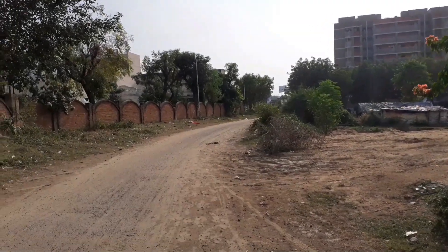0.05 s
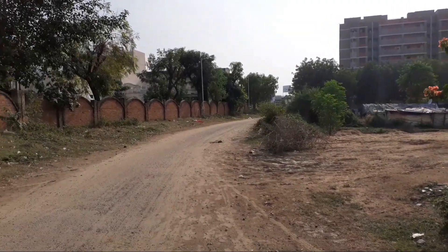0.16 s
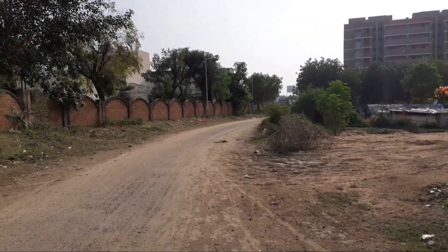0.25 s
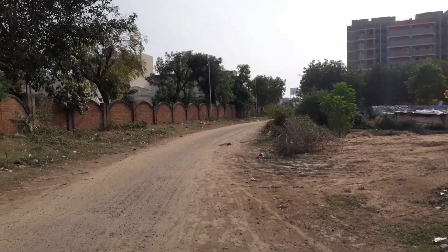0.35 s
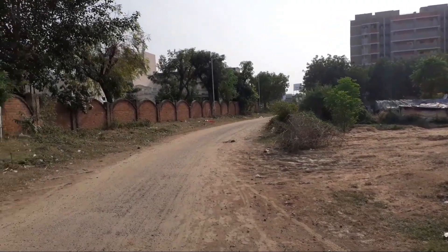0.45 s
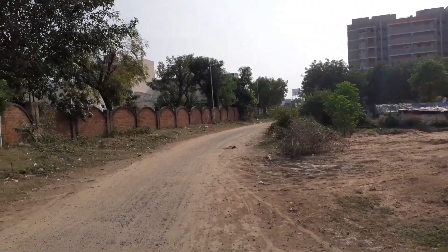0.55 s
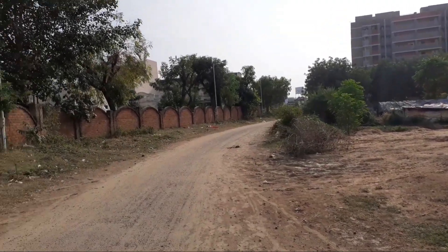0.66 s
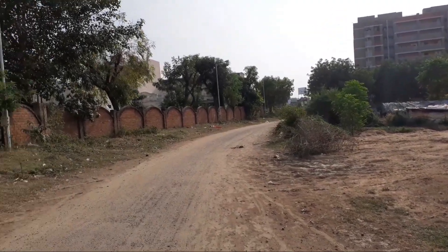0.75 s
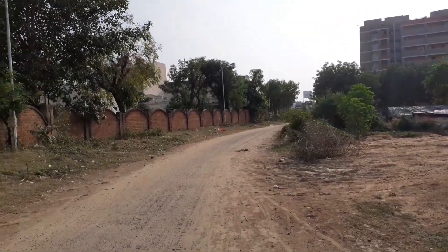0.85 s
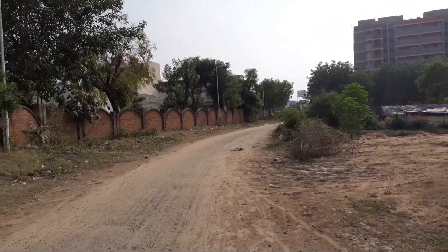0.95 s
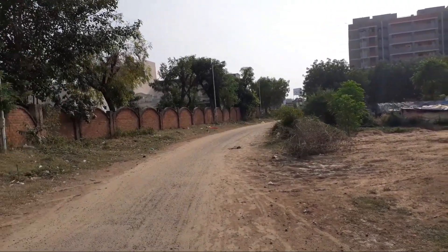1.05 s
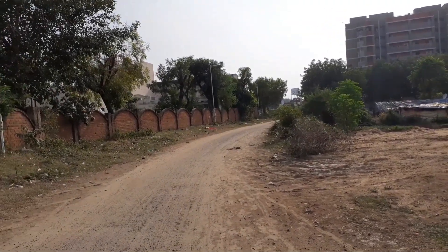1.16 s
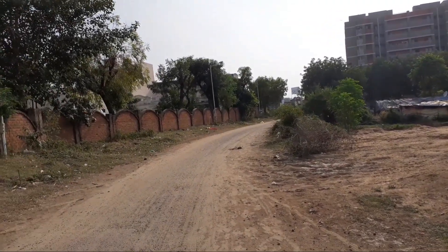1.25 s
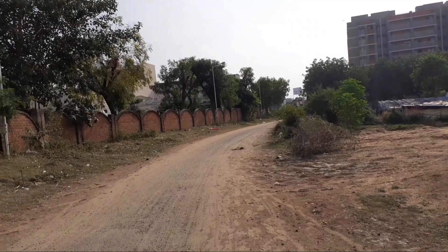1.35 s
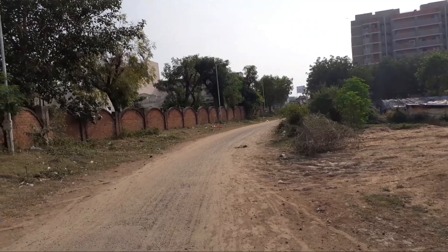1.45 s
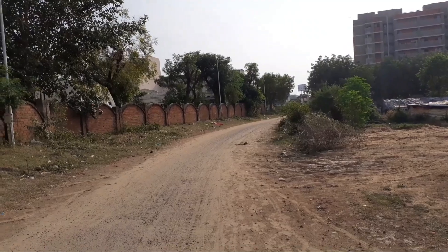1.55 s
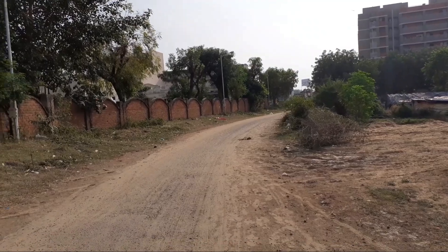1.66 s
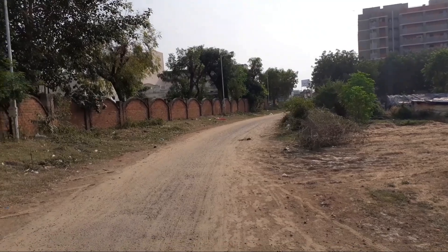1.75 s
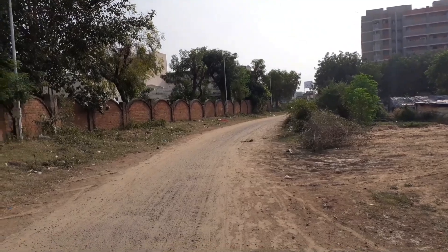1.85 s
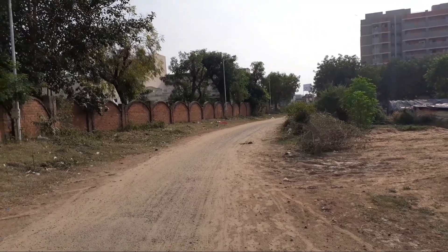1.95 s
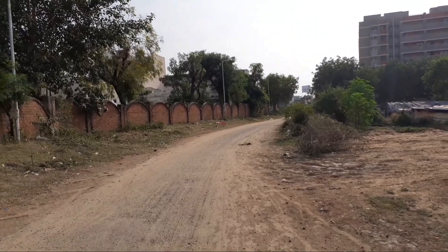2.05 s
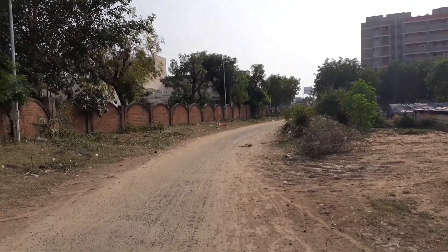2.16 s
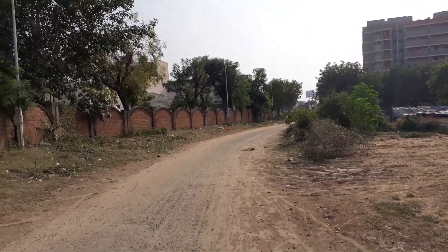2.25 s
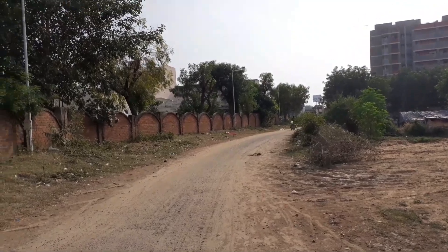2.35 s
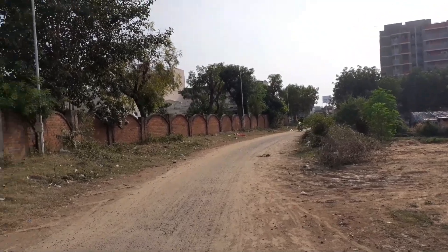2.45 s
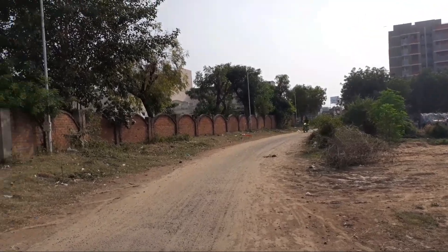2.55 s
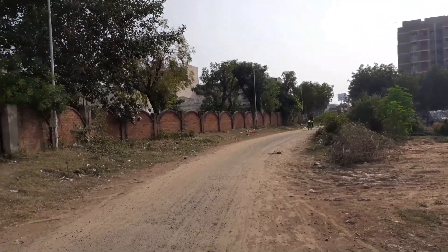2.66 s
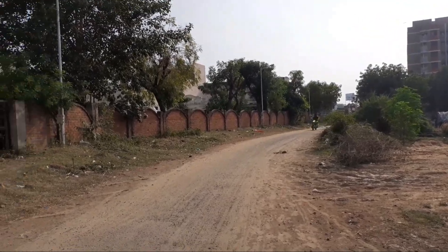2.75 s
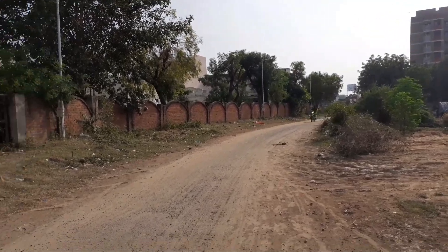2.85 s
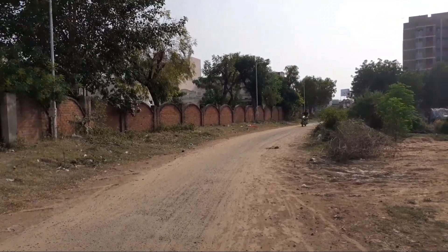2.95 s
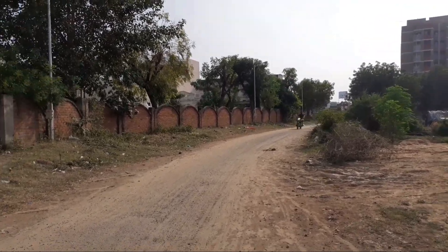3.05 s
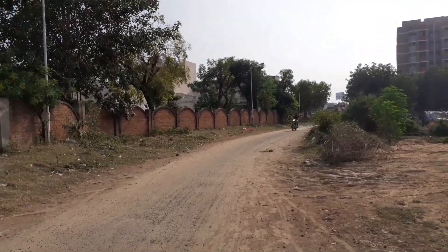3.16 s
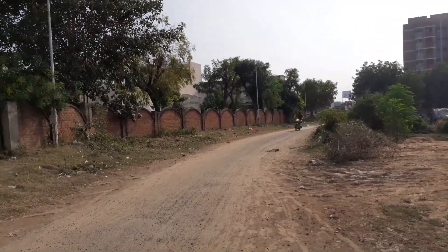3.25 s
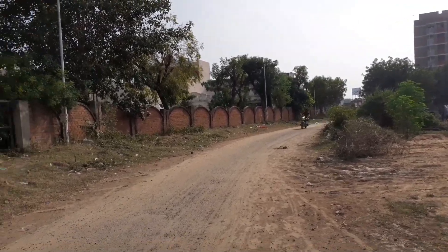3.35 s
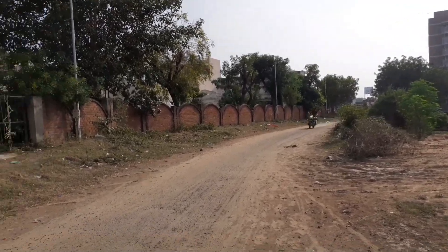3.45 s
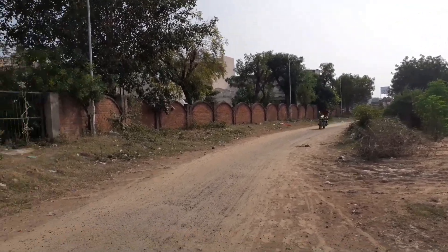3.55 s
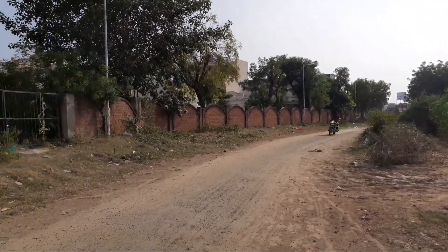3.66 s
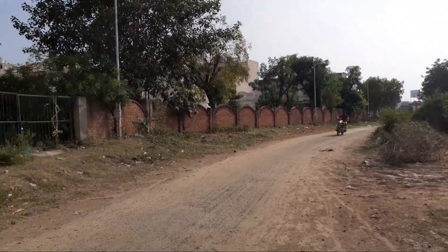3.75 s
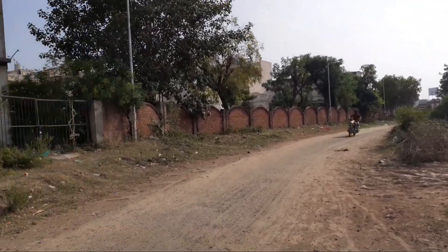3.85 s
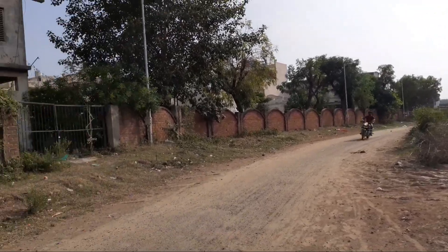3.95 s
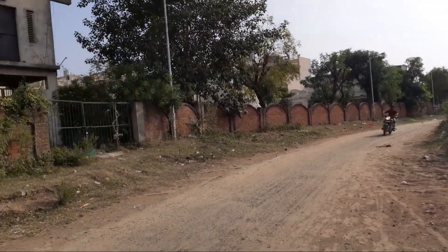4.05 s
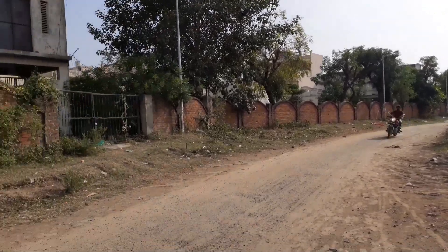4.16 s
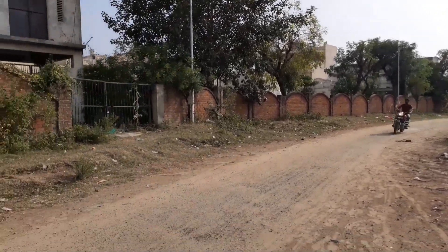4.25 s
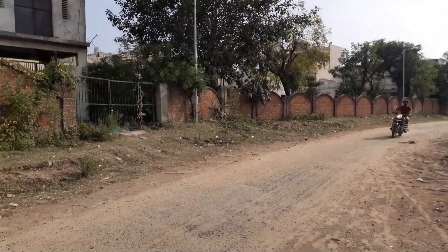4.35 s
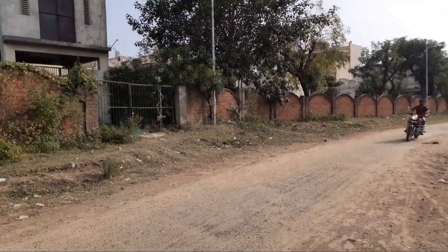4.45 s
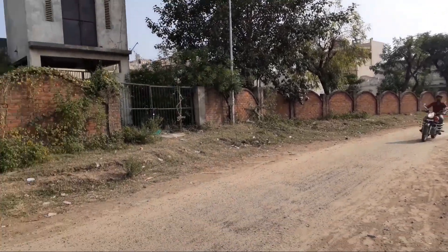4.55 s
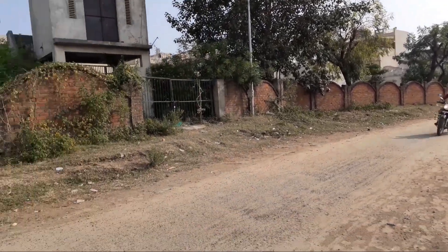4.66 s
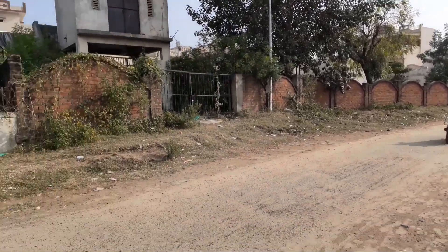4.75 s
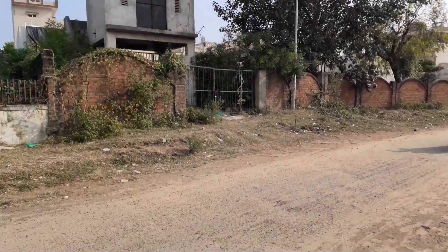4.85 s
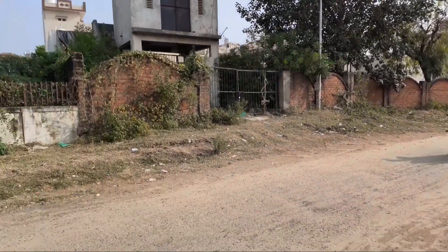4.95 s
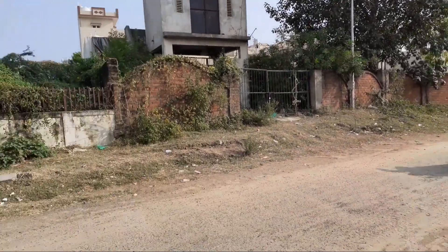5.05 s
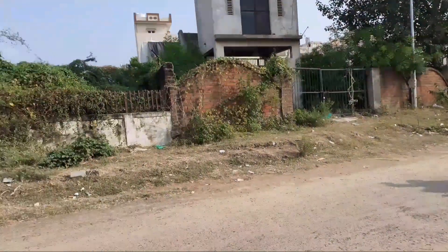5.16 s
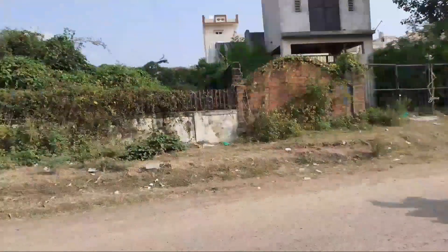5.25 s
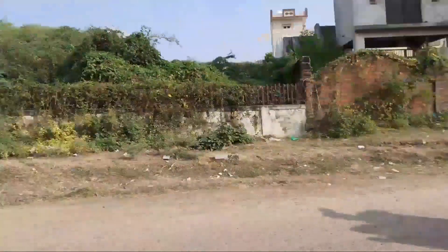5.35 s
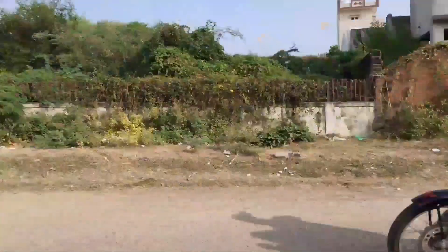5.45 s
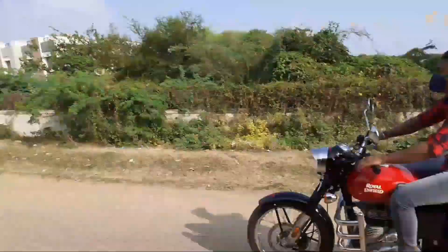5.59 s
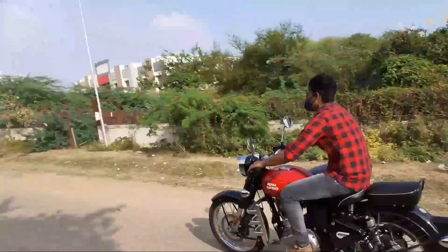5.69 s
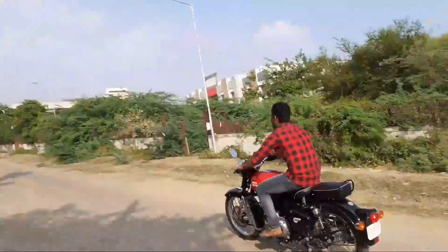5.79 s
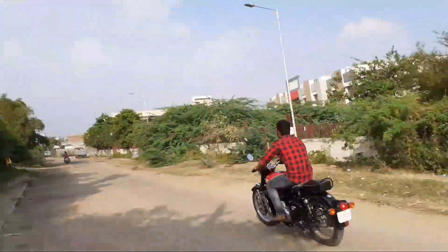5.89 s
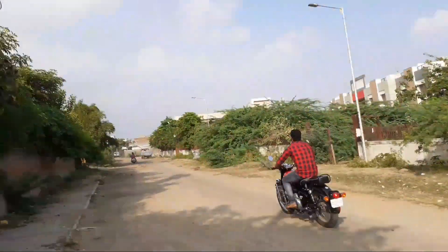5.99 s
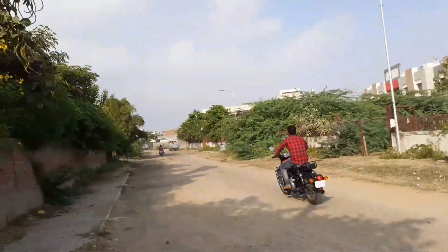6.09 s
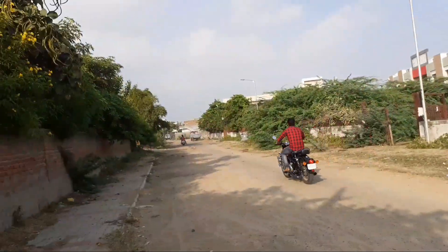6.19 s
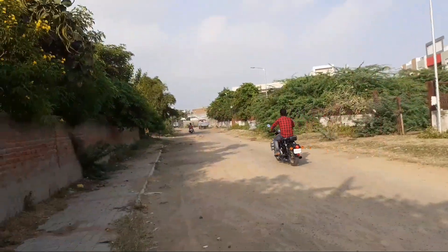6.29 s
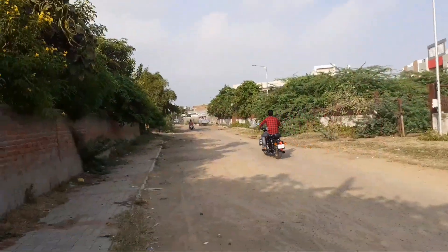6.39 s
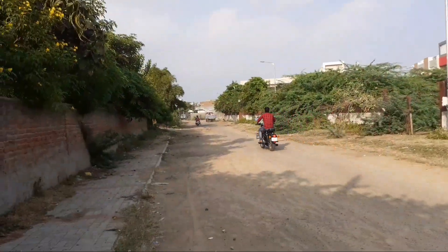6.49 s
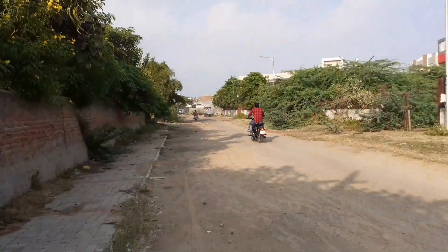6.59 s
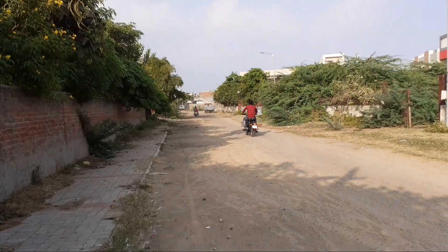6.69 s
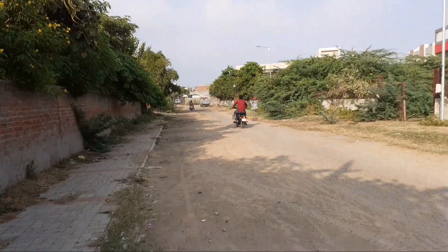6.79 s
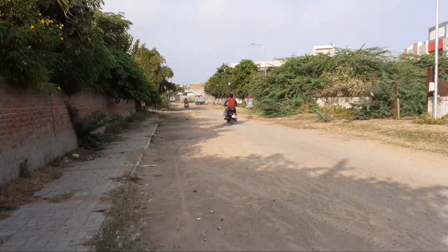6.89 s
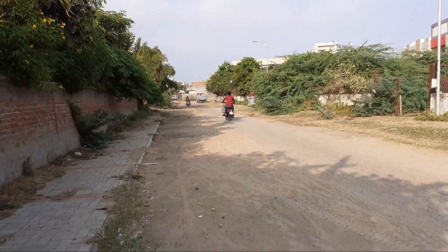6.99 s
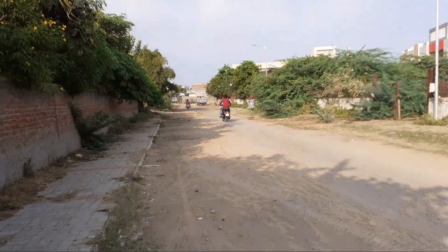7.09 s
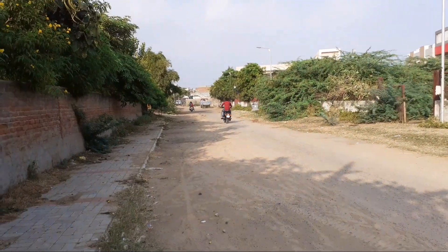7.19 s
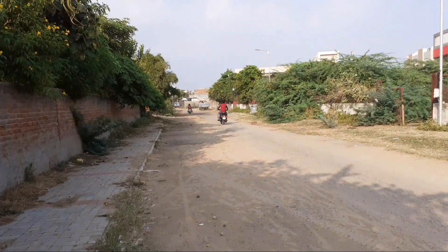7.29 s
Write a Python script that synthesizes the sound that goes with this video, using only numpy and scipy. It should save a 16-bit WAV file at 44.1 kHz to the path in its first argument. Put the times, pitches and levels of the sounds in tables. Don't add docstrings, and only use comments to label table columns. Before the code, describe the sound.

Roadside stereo phone microphone, open dirt road with walls, trees and a house. From 0 s a distant single-cylinder motorcycle thumps at about 27 beats per second over quiet field air, with tiny bird chirps near the start, 1.5 and 2.5 s. The throttle closes at 0.65-0.95 s for a gear change, then the beat pulls from about 25 up to 32. Second change at 2.65-2.95 s, third at 3.85-4.1 s, with muffled low pops and faint gear whine; each pull is louder and sharper, with quick wall echoes and light metallic ticks. From 4.9 to 5.9 s it is close: hard cracking exhaust, hiss, buzzing and clinking loose metal, house and gate echoes. At 5.94 s it passes and the crack drops abruptly to round low puffs, slowing to about 17 per second, with faint chain whirr around 6.3-6.7 s. It fades nearly to quiet air by 7.3 s.

```python
import sys
import numpy as np
from scipy import signal
from scipy.fft import rfft, irfft, next_fast_len
from scipy.io import wavfile
from scipy.ndimage import uniform_filter1d, map_coordinates

SR = 44100
rng = np.random.default_rng(int(sys.argv[2]) if len(sys.argv) > 2 else 0)


def wav_record(signal):
    frames = np.transpose(np.atleast_2d(signal))
    bounded = np.clip(frames, -1, 1)
    quanta = np.round(bounded * 32767).astype(np.int16)
    wavfile.write(sys.argv[1], SR, quanta)


def ratio_of_db(decibels):
    return 10 ** (np.asarray(decibels, float) / 20)


N = 323208
T = np.arange(N) / SR
PASSED_S = 5.94
COASTING = 0.16

# pitch_hz, level_db
FIELD = [(40, -38), (90, -8), (300, -3.5), (620, -4), (1200, -21.5), (3800, -20.5), (8300, -33),
         (15500, -36)]
# start_s, length_s, start_hz, end_hz, level_db
BIRDS = [(.13, .03, 4700, 5600, -54), (.64, .025, 5200, 4600, -61), (.72, .025, 4700, 5000, -61),
         (1.57, .03, 4700, 5300, -55), (6.9, .19, 4000, 6100, -74), (.08, .06, 2700, 2250, -48),
         (0, .05, 2950, 2850, -52), (1.44, .045, 3300, 3150, -49), (2.45, .06, 3650, 3600, -49),
         (2.47, .04, 5150, 5200, -55), (2.51, .04, 5900, 5850, -56)]
# middle_s, length_s, level_db
SCUFFS = [(1.035, .055, -42), (2.89, .008, -45), (3.14, .025, -46), (.38, .03, -60), (6.5, .006, -60),
          (5.082, .012, -40), (5.236, .008, -40), (5.929, .006, -36), (5.947, .006, -40)]
# pitch_hz, time_to_fade_60_db_s
TREES = [(100, 1), (500, 0.12), (3000, 0.31)]
# pitch_hz, likeness_0_to_1
ALIKE = [(60, 1), (500, 0.74), (1500, 0.074), (3000, 0.049), (7000, 0.029), (15000, 0.033)]
# start_s, length_s, start_hz, end_hz, level_db
GLIDES = [
    (6.331, 0.216, 323, 380, -49),
    (6.466, 0.282, 270, 330, -50),
]
# start_s, peak_db, pitch_hz
RATTLES = [(0.515, -22.5, 2300), (1.5509, -28, 2100), (3.1807, -36, 3410), (4.028, -26.5, 1970),
           (4.86, -15, 2880), (5.082, -22, 3380), (5.224, -15, 2620), (5.333, -3, 2160),
           (5.449, -10.5, 2340), (5.609, -9, 2920), (5.6706, -7, 2280), (5.7358, -23, 2440),
           (5.9144, -2.5, 2840)]
# start_s, end_s, peak_db, pitch_hz
SHIELD = [
    (1.22, 1.53, -36, 2020),
    (3.08, 3.4, -34, 3500),
    (3.68, 3.88, -32, 3500),
    (4.33, 4.8, -25.5, 3410),
    (5.37, 5.887, -12, 2280),
]
# start_s, peak_db, pitch_hz
MORE_RATTLES = [(0.3282, -40, 1800), (1.1578, -46, 2610), (1.3129, -35, 1850), (1.5883, -32, 1960),
                (1.6207, -32, 2010), (1.7025, -27, 2420), (1.7399, -31, 2410), (1.777, -24, 2040),
                (1.8138, -25, 2050), (1.8592, -28.5, 2310), (1.8856, -28, 2010), (1.921, -27, 2050),
                (1.9565, -30, 3150), (2.0951, -28, 2020), (2.2313, -34, 1970), (2.2638, -32, 2130),
                (2.3291, -34, 2480), (2.361, -28, 2850), (3.0659, -48, 2640), (3.0944, -34, 2320),
                (3.1223, -30, 1910), (3.21, -29, 1830), (3.4206, -24.5, 3500), (3.4481, -35, 2130),
                (3.5364, -30, 1890), (3.5658, -23, 3520), (3.5932, -25, 3450), (3.6507, -22.5, 3440),
                (3.7349, -34, 3130), (4.2946, -38, 1980), (4.4702, -33, 2150), (4.5905, -32, 2130),
                (4.8953, -19, 2860)]
# start_s, peak_db, pitch_hz
CLINKS = [(5.0035, -30, 4430), (5.0474, -36, 3570), (5.1365, -25, 4100), (5.1911, -41, 3644),
          (5.2574, -23, 3740), (5.2994, -29, 4500), (5.3326, -19, 6850), (5.3647, -27, 3850),
          (5.3842, -26, 3990), (5.5083, -26, 3520), (5.575, -27, 4280), (5.6376, -23, 3600),
          (5.7019, -37, 3700), (5.7984, -28, 4000), (5.8491, -27, 4150), (5.882, -22, 5170)]
# middle_s, length_s, pitch_hz, level_db
WHINE = [
    (2.95, 0.15, 1016, -52),
    (4.13, 0.17, 1010, -47),
]
# pitch_hz, level_db
GEAR = [(200, -5.5), (400, 5), (700, -3), (1000, -9), (1300, -10.5), (1770, -15.5), (2050, -13),
        (2700, -14.5), (3530, -14.5), (4200, -19.5), (6000, -28.5), (9000, -62)]
# pitch_hz, level_db
AIR = [(3500, -7), (5000, -10), (7000, -6.5), (8000, -9), (8400, -15), (8900, -9), (12500, -11),
       (14800, -17), (15600, -26)]
# machinery_db, bright_hiss_db
BRIGHT = [(-76, -93), (-52, -64), (-40.5, -52.5), (-40, -60), (-38.5, -50.5), (-29.5, -41.5)]
# time_s, gain_over_steady_hiss
FLARE = [(0, 0.83), (1, 0.73), (1.5, 0.72), (2.3, 1.4), (2.7, 0.34), (3.1, 1.2), (3.8, 0.7), (4.2, 0.65),
         (5, 0.91), (5.3, 2), (5.6, 3.3), (5.9, 2.8), (6, 0.4), (7.33, 1.1)]
BRIGHT_ECHO_DB = (-2, 0.5, 4)
# closes_s, shut_s, starts_to_open_s, open_s, depth_0_to_1
SHIFTS = [
    (.63, .72, .945, .96, 1),
    (2.62, 2.75, 2.915, 2.94, 1),
    (2.8, 2.9, 2.98, 3.06, .52),
    (3.84, 3.9, 4.07, 4.09, .95),
    (4, 4.05, 4.225, 4.3, .57),
    (5.97, 6, 6.02, 6.04, .6),
    (.9, .94, .98, 1.05, .4),
]
# pitch_hz, level_db
BURBLE = [(50, -27), (100, 0.5), (170, -9.5), (260, -32), (400, -61)]
BURBLE_DB = [-42, -48, -60, -31, -46, -40]
# time_s, lag_ms, level_db
YARD = [(6.04, 13, -6), (6.3, 10, -4), (7.33, 8, -3)]
# time_s, firings_per_s
FIRING = [(0, 26.7), (.719, 33.78), (1.098, 25.31), (1.351, 24.63), (2.634, 32.52), (2.861, 28.96),
          (3.146, 35.38), (3.283, 32.99), (3.956, 37.29), (4.089, 35.31), (4.339, 28.2), (4.784, 29.58),
          (5.293, 31.07), (5.541, 31.67), (5.848, 30.79), (5.994, 27.1), (6.74, 18.6), (7.33, 17)]
# time_s, late_ms
HUNTING = [(2.85, 0), (2.97, 1.3), (3.05, 1.1), (3.125, -1.2), (3.26, .7), (3.4, 0), (3.51, -.3),
           (3.77, .5), (3.87, 0), (4.1, .5), (4.19, -1.2), (4.31, 1.1), (4.4, -.1), (4.67, .5), (4.86, -.4),
           (4.97, .5), (5.07, 0), (5.23, .6), (5.42, -.4), (5.52, .5), (5.87, .2), (5.9, -.7), (5.93, -3),
           (5.97, 3), (6.04, 2.2), (6.25, .3), (6.5, -1.5), (6.8, 0)]
# time_s, exhaust_crack_db, machinery_db
RIDE = [(0, -30, -40), (.6, -30.5, -39), (1.1, -31.5, -40), (1.6, -28.5, -40), (2.6, -23.5, -38.5),
        (3.1, -21.5, -39), (3.8, -18.5, -35), (4.3, -17, -37.5), (4.6, -15.5, -34.5), (5.15, -16, -31.5),
        (5.3, -16, -29), (5.9, -17, -29.5), (5.94, -35, -35.5), (6.2, -40, -45.5), (6.4, -46.5, -47),
        (6.8, -59, -54), (7.1, -69.5, -61), (7.33, -70, -85)]
# crack_db, thump_db, boom_db
PRESSURE = [(-78, -70, -51), (-47.5, -37.5, -36.5), (-36, -22, -32.5), (-20.5, -28, -36.5),
            (-13, -13.5, -32)]
# time_s, late_ms, extra_db, idle_stroke_db
OVERRUN = [(.66, 0, 0, -5), (.7, 7, -1, -5), (.775, 7, -1, -5), (.79, 18, -1, -3), (.94, 18, -1, -3),
           (.955, 0, 0, -5), (2.7, 0, 0, -14), (2.735, 8, 4, -16), (2.92, 8, 4, -16), (2.93, 0, 0, -14),
           (3.87, 0, 0, -5), (3.93, 17, 6, -4), (4.07, 17, 6, -4), (4.085, 0, -3, -5), (4.22, 0, -3, -5),
           (4.27, 0, 0, -5)]
# time_s, lag_ms, level_db
WALL = [(0, 4.3, -4), (1.1, 5.3, -2), (2, 6.1, -2), (2.75, 7.1, -1), (3.25, 8.8, 0), (3.5, 10, 0),
        (3.75, 11.7, -1), (3.9, 13, -2), (4.09, 15, -1), (4.27, 16.6, -3), (4.4, 17.5, -12),
        (4.8, 17.5, -12), (4.9, 17.5, -22)]
# time_s, lag_ms, level_db
HOUSE = [(4.95, 19.6, -14), (5.03, 20.6, -4), (5.15, 22.2, -1), (5.35, 25.8, -5), (5.55, 29.4, -8),
         (5.7, 31.5, -18)]
# time_s, lag_ms, level_db
GATE = [(5.1, 6.3, -14), (5.3, 11.7, -7), (5.5, 14.9, -4), (5.7, 18.1, -5), (5.9, 18.1, -10)]
# time_s, lag_ms, level_db
WALL_TWICE = [(0.0, 8.6, -11), (0.5, 8.8, -9), (1.0, 10.3, -8), (1.5, 12.6, -9), (2.0, 12.5, -7),
              (2.5, 12.5, -7), (3.0, 12.6, -4), (3.15, 12.4, -6), (3.4, 15, -12)]
# time_s, lag_ms, level_db
HOUSE_BOUNCE = [(4.95, 22, -16), (5.05, 22.9, -5), (5.15, 24.4, -6), (5.25, 26, -11), (5.35, 27.6, -20)]
# pitch_hz, width_hz, level_db
PIPE = [(150, 110, 0)]
# pitch_hz, width_hz, level_db
SILENCER = [(60.5, 14.6, 6.5), (97.4, 46, 3.5), (121.4, 17, -3.5)]
# pitch_hz, width_hz, level_db
RASP = [(848, 246, 5), (980, 340, 10.5), (1409, 305, 8), (2100, 2330, -2.5)]
# pitch_hz, width_hz, level_db
BARK = [(912, 190, 0)]
# pitch_hz, width_hz, level_db
SNARL = [(690, 210, 0)]
# time_s, then share near order 4, 5.5 and 7
IDLE_TURN = [(0, 0, 0.14, 1), (1.4, 0.5, 0.0097, 0.63), (2.6, 0, 0.64, 0.019), (3.15, 0.052, 0, 0.38),
             (3.35, 0.35, 0, 0), (4, 0, 0.58, 0.48), (4.4, 0.5, 0, 0.5), (5.3, 0, 0.16, 0.31),
             (5.8, 0.49, 0.14, 0), (5.95, 0, 0, 0.057)]
# time_s, ms_by_which_left_lags
BEARING = [(0, 0.019), (3.2, 0.07), (3.7, 0.036), (4.2, 0.18), (4.7, 0.19), (5.2, 0.27), (5.8, 0.23),
           (6.2, 0.08), (6.6, -0.23), (7.33, -0.23)]


def unit(x):
    return x / np.sqrt(np.mean(x ** 2) + 1e-20)


def along(points, hz):
    f, v = np.transpose(points)
    return np.interp(np.log(hz + 1), np.log(f + 1), v)


def curves(rows, t=T):
    s, *cols = np.transpose(rows)
    return [np.interp(t, s, c) for c in cols]


def wobble(rate):
    return map_coordinates(rng.standard_normal(int(N * rate / SR) + 4), [T * rate])


def filtered(x, response):
    m = next_fast_len(N + SR // 2)
    return irfft(rfft(x, m) * response(np.fft.rfftfreq(m, 1 / SR)), m)[..., :N]


def through(blows, response):
    energy = np.mean(abs(response(np.linspace(1, SR / 2, 4096))) ** 2)
    return filtered(blows, response) / np.sqrt(energy * 30 / SR)


def resonances(modes, f):
    total = 0
    for k, (centre, width, db) in enumerate(modes):
        ring = 1j * f * width / (centre * centre - f * f + 1j * f * width)
        total = total + (-1) ** k * ratio_of_db(db) * ring
    return total


def shock(f, centre_hz, lean):
    u = f / centre_hz
    return -u ** 1.4 * np.exp(-u ** 2 / 2 - 1j * lean)


def spikes(times, sizes):
    at = np.clip(np.round(times * SR).astype(int), 0, N - 1)
    return np.bincount(at, sizes, N)


def pair(spectrum):
    def response(hz):
        turn = np.arccos(np.clip(along(ALIKE, hz), 0, 1)) / 2
        return ratio_of_db(along(spectrum, hz)) * [np.cos(turn), np.sin(turn)]
    mid, side = filtered(rng.standard_normal((2, N)), response)
    return unit(np.array([mid + side, mid - side]))


def patchy(x, depth_db):
    z = signal.stft(x, nperseg=256)[2]
    field = uniform_filter1d(rng.standard_normal(z.shape[1:]), size=3, axis=0)
    field = uniform_filter1d(field, size=12, axis=1)
    return unit(signal.istft(z * ratio_of_db(depth_db * unit(field)), nperseg=256)[1][:, :N])


def cycles():
    rate = curves(FIRING)[0]
    return np.cumsum(rate) / SR - .31 - rate * curves(HUNTING)[0] / 1000


def firings():
    count = cycles()
    return np.interp(np.arange(int(count[-1])), count, T)


def throttle(t):
    dips = [np.interp(t, times, [0, depth, depth, 0]) for *times, depth in SHIFTS]
    return np.clip(np.maximum(np.max(dips, axis=0), COASTING * (t > PASSED_S)), 0, 1)


def field_air():
    return ratio_of_db(-58.5) * ratio_of_db(2 * wobble(6)) * pair(FIELD)


def chirps(rows):
    out = 0
    for s, long, start_hz, end_hz, db in rows:
        u = np.clip((T - s) / long, 0, 1)
        phase = 2 * np.pi * np.cumsum(start_hz + (end_hz - start_hz) * u) / SR
        tone = np.sin(.6 * wobble(150) + phase)
        out = out + ratio_of_db(db + 2.6 * wobble(120)) * np.sin(np.pi * u) * tone
    return out


def scuffs():
    swell = sum(ratio_of_db(db) * np.exp(-((T - s) / long * 2) ** 2) for s, long, db in SCUFFS)
    return swell * pair([(500, -25), (1000, -2), (1650, 4), (2000, 9.5), (5000, 1), (12000, -8), (15500, -49)])


def scattered(x, hop_s=0.32):
    out, size = np.zeros((2, N + SR)), int(hop_s * SR)
    padded = np.pad(x, (size, 2 * size))
    for at in range(0, N + size, size):
        hz, t, z = signal.stft(rng.standard_normal((2, SR // 4)), SR, nperseg=256)
        share = np.clip(along(ALIKE, hz), 0, 1)[:, None]
        z[1] = share * z[0] + np.sqrt(1 - share ** 2) * z[1]
        fade = ratio_of_db(-60 * t / along(TREES, hz)[:, None])
        tail = signal.istft(z * fade, SR, nperseg=256)[1]
        piece = padded[at:at + 2 * size] * np.hanning(2 * size)
        wet = signal.fftconvolve(piece[None], tail / np.linalg.norm(tail[0]), axes=1)
        out[:, at:at + wet.shape[1]] += wet[:, :N + SR - at]
    return out[:, size - 200:size - 200 + N]


def trees(pipe):
    heard = pipe * ratio_of_db(-3.5 * np.exp(-((T - 5.7) / .5) ** 2))
    return ratio_of_db(-6.5) * scattered(filtered(heard, lambda hz: hz ** 2 / (hz ** 2 + 130 ** 2)))


def rattles():
    out, t = np.zeros(N + SR), np.arange(SR // 20) / SR
    fired = firings()
    luck = rng.standard_normal((len(fired), 2))
    buzz = []
    for start, end, db, hz in SHIELD:
        for s, (a, b) in zip(fired, luck):
            if start < s < end:
                buzz.append((s, db + 4 * a, hz * (1 + 0.021 * b)))
    for s, db, hz in RATTLES + buzz + MORE_RATTLES + CLINKS:
        ring = np.sin(2 * np.pi * hz * t) * ratio_of_db(-60 * t / .014)
        snap = 0.13 * np.diff(rng.standard_normal(len(t) + 1)) * ratio_of_db(-60 * t / 0.0039)
        out[round(s * SR):][:len(t)] += ratio_of_db(db - 5) * (ring + snap)
    return out[:N]


def whine():
    out = 0
    for s, long, hz, db in WHINE:
        swell = np.exp(-((T - s) / long * 2) ** 4)
        out = out + ratio_of_db(db + 1.9 * wobble(30)) * swell * np.sin(2 * np.pi * hz * T + wobble(46))
    return out


def machinery():
    works_db = curves(RIDE)[1]
    shut = np.clip(3.1 * throttle(T), 0, 1) * (T < PASSED_S)
    hiss_db = works_db - 5 * shut
    bright_db = curves(BRIGHT, works_db)[0] - 6 * shut
    fired = firings() + .0008
    luck = rng.standard_normal((len(fired), 4))
    kicks = spikes(fired, ratio_of_db(2.5 * luck[:, 0]))
    for k, (rows, db) in enumerate(zip([WALL, HOUSE, GATE], BRIGHT_ECHO_DB)):
        lag, loss_db = curves(rows, fired)
        facing = (fired > rows[0][0]) & (fired < rows[-1][0])
        kicks += spikes(fired + lag / 1000, facing * ratio_of_db(loss_db + db + 2.5 * luck[:, k + 1]))
    flare_s = .0025
    flare = signal.lfilter([1], [1, -np.exp(-1 / (flare_s * SR))], kicks)
    flare = flare * curves(FLARE)[0] * (1 - 0.89 * shut)
    gear = ratio_of_db(hiss_db + 1 + 0.71 * wobble(90)) * (1 + flare) * patchy(pair(GEAR), depth_db=2.5)
    gear = gear - 0.46 * (T > PASSED_S) * filtered(gear, lambda hz: 1 / (1 + (hz / 600) ** 4))
    return gear + ratio_of_db(bright_db - 1 + 0.42 * wobble(140)) * (1 + flare) * pair(AIR)


def burble():
    level = sum(ratio_of_db(db) * np.interp(T, row[:4], [0, 1, 1, 0]) ** 2 for db, row in zip(BURBLE_DB, SHIFTS))
    rumble = unit(filtered(rng.standard_normal(N), lambda hz: ratio_of_db(along(BURBLE, hz))))
    return level * ratio_of_db(5.0 * wobble(25)) * rumble


def puffs():
    fired = firings()
    fired = fired[fired > PASSED_S] + .003
    luck = rng.standard_normal((len(fired), 2))
    size = ratio_of_db(curves(RIDE, fired)[0] + 7.5 - 32 * (throttle(fired) - COASTING) + luck[:, 0])
    lag, loss_db = curves(YARD, fired)
    pushes = spikes(fired, size) + spikes(fired + lag / 1000, size * ratio_of_db(loss_db + luck[:, 1]))
    houses_db = np.interp(fired, [6.2, 6.6], [-8, -1])
    pushes += spikes(fired + 0.0264 + 0.0033 * luck[:, 1], size * ratio_of_db(houses_db))
    return through(pushes, lambda f: -shock(f, centre_hz=72.7, lean=1.5))


def firing_pushes():
    fired = firings()
    luck = rng.standard_normal((len(fired), 10))
    crack_db, works_db = curves(RIDE, fired)
    shut, passed = throttle(fired), fired > PASSED_S
    thump_db, boom_db = curves(PRESSURE, crack_db)
    thump_db = thump_db - 5 * passed
    boom_db = boom_db - 5.5 * shut + passed
    boom_db += np.clip(works_db + 37, 0, None)
    fired = fired + (.00007 + .0004 * shut) * luck[:, 7]
    crack_db = crack_db - 20.5 * shut + (.8 + 2 * shut) * luck[:, 4]
    blows = spikes(fired, ratio_of_db(crack_db))
    late_ms, extra_db, idle_db = curves(OVERRUN, fired)
    late, thump_db = fired + late_ms / 1000, thump_db + extra_db
    pushes = spikes(late, ratio_of_db(thump_db + .8 * luck[:, 5]))
    pushes += spikes(late + .014, shut ** 6 * ratio_of_db(thump_db + idle_db + 3 * luck[:, 8]))
    leafy = 0
    for k, rows in zip((0, 1, 2, 3, 9), [WALL, HOUSE, GATE, WALL_TWICE, HOUSE_BOUNCE]):
        lag, loss_db = curves(rows, fired)
        facing = (fired > rows[0][0] - .02) & (fired < rows[-1][0] + .02)
        back_s = fired + (lag + .09 * luck[::-1, k]) / 1000
        back = spikes(back_s, facing * ratio_of_db(crack_db + loss_db + 1.1 * luck[:, k]))
        if k == 2:
            leafy = back
        else:
            blows = blows + back
        pushes += spikes(late + lag / 1000, facing * ratio_of_db(thump_db + loss_db - 11))
    for trips in (3, 4):
        bounce_s = fired + trips * curves(WALL, fired)[0] / 1000
        blows += spikes(bounce_s, (fired < 2.6) * ratio_of_db(crack_db - 27 - trips))
    ticks = spikes(fired, (fired > PASSED_S) * ratio_of_db(crack_db - 6.5))
    booms = spikes(late, ratio_of_db(boom_db + luck[:, 6]))
    booms += spikes(late + .021 + .004 * luck[:, 7], shut ** 6 * ratio_of_db(boom_db - 4 + 3 * luck[:, 8]))
    return blows, leafy, ticks, pushes, booms


def crack(blows, leafy, ticks, close, abeam):
    both = blows - np.roll(abeam * blows, 106)
    both -= np.roll(0.17 * (1 - abeam / .75) * blows, round(0.00292 * SR))
    out = ratio_of_db(-3.5) * through(close * both, lambda f: shock(f, centre_hz=329.0, lean=1.3))
    out += ratio_of_db(-4) * through(np.roll(leafy, 40) * 1.2, lambda f: shock(f, centre_hz=240, lean=0))
    out += ratio_of_db(-2.0) * through((1 - close) * both, lambda f: shock(f, centre_hz=256.5, lean=1.1))
    return out + through(ticks, lambda f: resonances([(730, 170, 0)], f) ** 2)


def idle_turn(x, size=64):
    turned = cycles()
    grid = np.arange(0, turned[-1], 1 / size)
    low = filtered(x, lambda hz: hz < 500)
    spectrum = rfft(np.interp(np.interp(grid, turned, T), T, low))
    orders = np.fft.rfftfreq(len(grid), 1 / size)
    for order, share in zip((4, 5.5, 7), curves(IDLE_TURN)):
        band = np.exp(-((orders - order) / 0.93) ** 2 - 1j * np.pi * orders)
        repeat = map_coordinates(irfft(spectrum * band, len(grid)), [turned * size])
        x = x + share * (1 - throttle(T)) * repeat
    return x


def exhaust():
    blows, leafy, ticks, pushes, booms = firing_pushes()
    close = np.clip((curves(RIDE)[0] + 27) / 9, 0, 1)
    abeam = .75 * np.exp(-((T - 5.7) / .35) ** 2)
    thump = ratio_of_db(-8.5) * through(np.roll(pushes, -round(.0036 * SR)),
                                lambda f: (resonances(PIPE, f) / (1 + 1j * f / 320)) ** 2)
    thump = thump * ratio_of_db(6 * abeam)
    boom = through(booms, lambda f: resonances(SILENCER, f) / (1 + 1j * f / 120) ** 2)
    rasp_db = -20.5 - 13 * throttle(T) * (T < PASSED_S)
    rasp = ratio_of_db(rasp_db) * through(np.roll(blows, -30), lambda f: resonances(RASP, f) ** 2)
    bark = ratio_of_db(-24) * through(close * np.roll(blows, 30), lambda f: resonances(BARK, f) ** 2)
    snarl = ratio_of_db(-20.5) * through(abeam * np.roll(blows, 20), lambda f: resonances(SNARL, f) ** 2)
    edge = ratio_of_db(-20) * through(blows, lambda f: -np.exp(.75j - ((f - 715) / 166) ** 2))
    return idle_turn(crack(blows, leafy, ticks, close, abeam) + thump + boom) + rasp + bark + snarl + edge


def scene():
    pipe = exhaust() + puffs() + burble()
    bike = pipe + rattles() + whine() + machinery()
    lag = curves(BEARING)[0] * SR / 2000
    ports = [map_coordinates(bike[k], [np.arange(N) - side * lag], mode="nearest")
             for k, side in enumerate([1, -1])]
    return np.array(ports) + trees(pipe) + scuffs() + chirps(BIRDS + GLIDES) + field_air()


def band_limit(x):
    return signal.sosfilt(signal.butter(12, 15750, fs=SR, output="sos"), x)


def record(dry):
    def ports(hz):
        lean_db = along([(600, 1.0), (1200, 2.2), (2600, -2.4), (4500, 0.65)], hz)
        return ratio_of_db(np.outer([.7, -.7], lean_db)) * (1j * hz / (45 + 1j * hz)) ** 3
    x = filtered(dry, ports)
    x = x / (1 + abs(x / .7) ** 6) ** (1 / 6)
    x = filtered(x, lambda hz: ratio_of_db(along([(14500, 2.5), (15700, -6), (15800, -90)], hz)))
    return band_limit(x)


dry = scene()
out = record(dry)
wav_record(out)
```